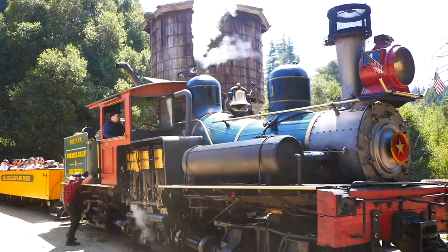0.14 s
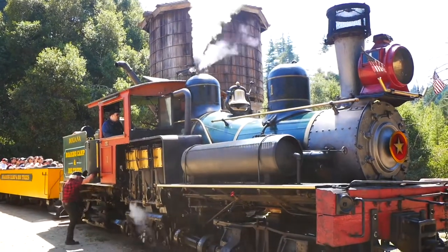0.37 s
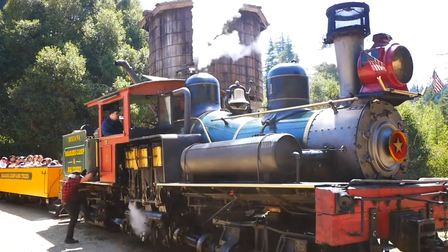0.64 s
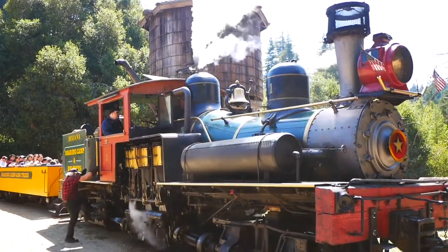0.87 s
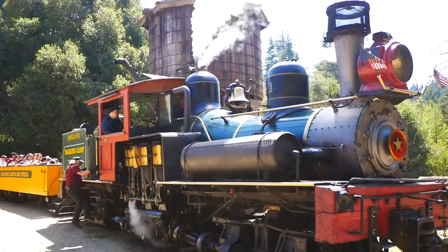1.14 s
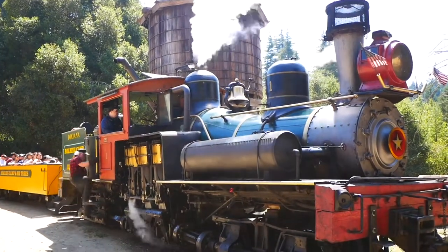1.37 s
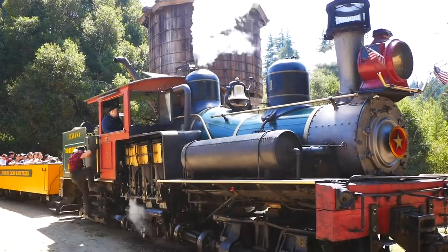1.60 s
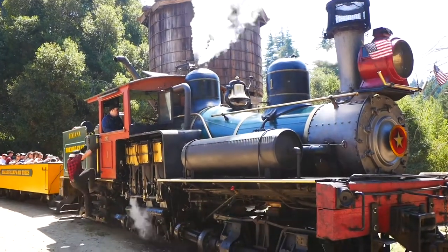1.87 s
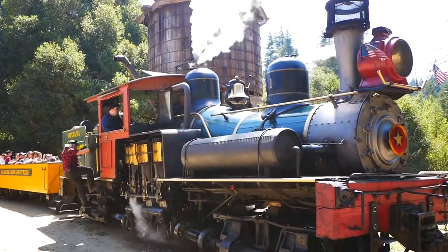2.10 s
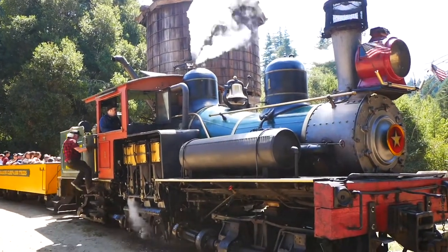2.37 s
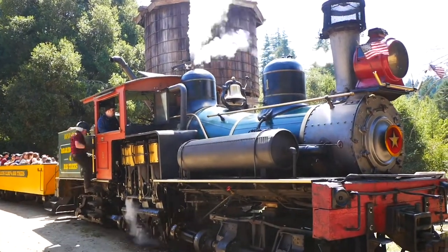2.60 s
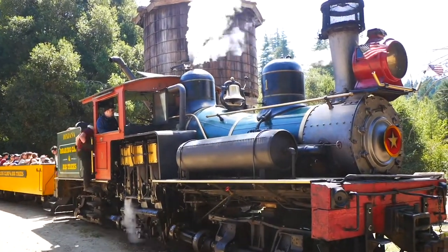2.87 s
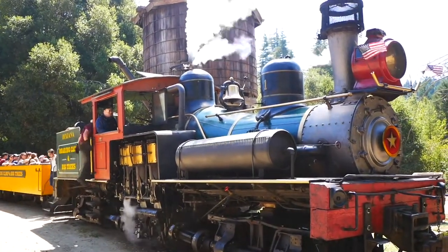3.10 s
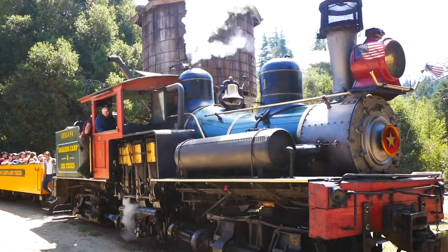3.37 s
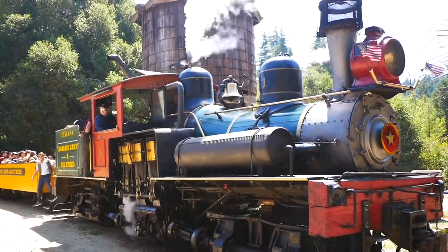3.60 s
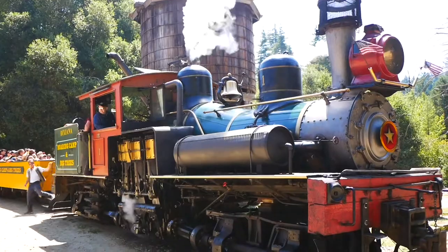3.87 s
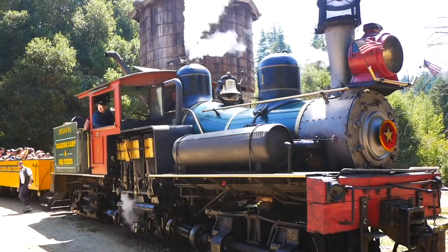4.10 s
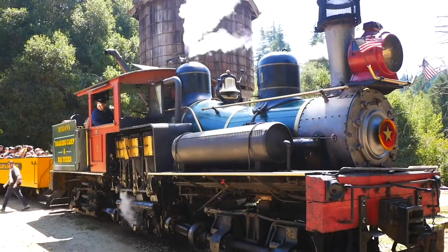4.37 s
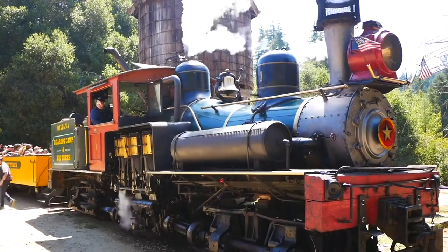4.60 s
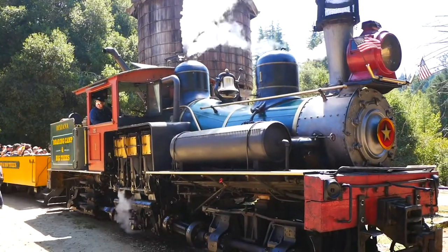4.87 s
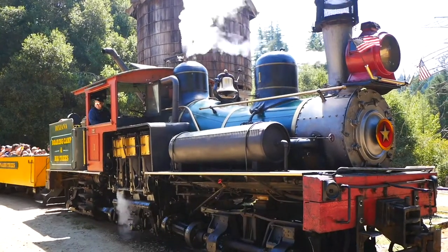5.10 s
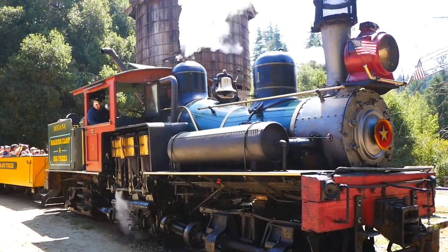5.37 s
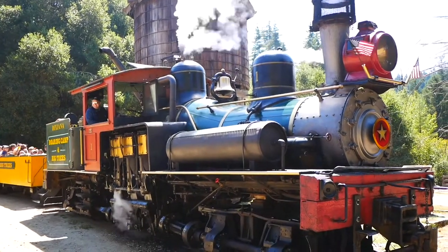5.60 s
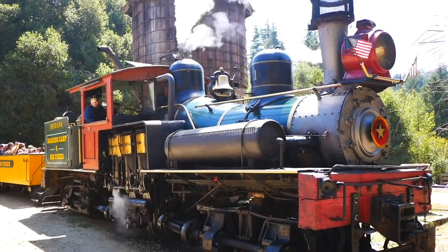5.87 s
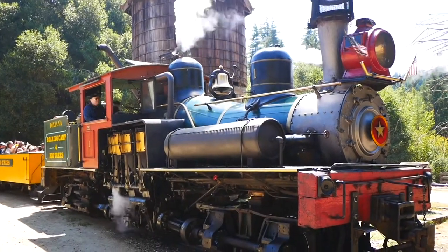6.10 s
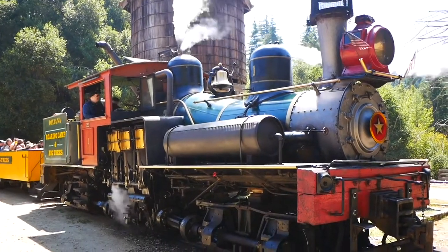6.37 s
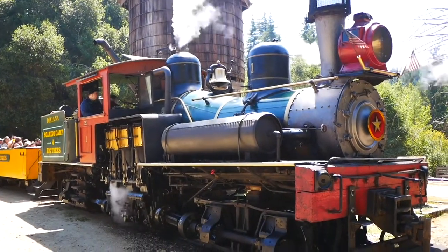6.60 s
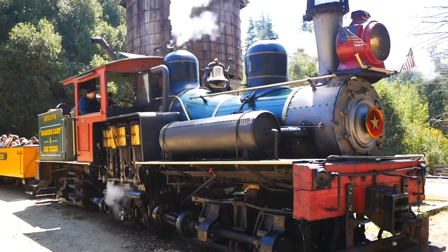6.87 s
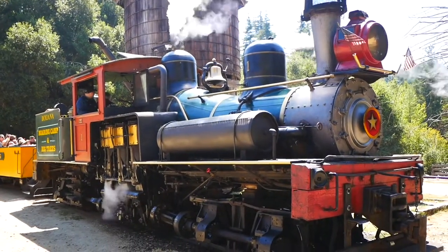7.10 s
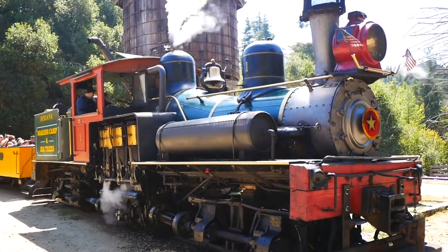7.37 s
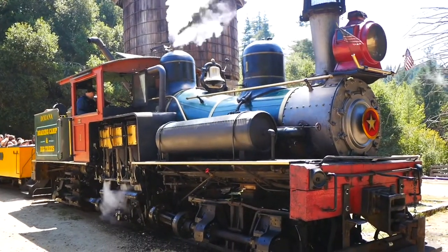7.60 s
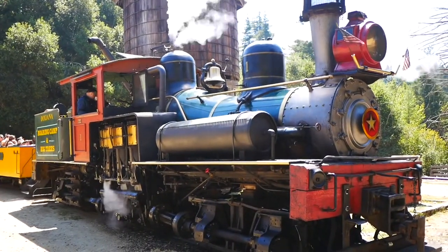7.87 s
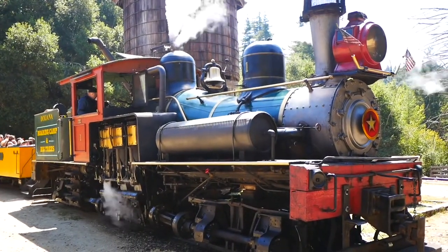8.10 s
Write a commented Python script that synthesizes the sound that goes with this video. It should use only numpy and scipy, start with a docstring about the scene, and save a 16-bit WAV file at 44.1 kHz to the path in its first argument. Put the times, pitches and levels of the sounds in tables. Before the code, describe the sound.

Steam escapes from a parked locomotive in a burst of bright hiss, while a thin, extremely high tone rings, then wavers, over soft rumble.

```python
"""A burst of bright hiss comes first: a standing steam locomotive vents steam outdoors, loudest at the start.
The hiss is noise coloured by the vent pipe. A very high whistle at the valve lip is a swept sine mixed with
narrow noise: breathy as it starts, soon almost pure, later wavering and breathy again.
Low noise that swells in puffs and a steady roar lie wide across the stereo field."""
import sys
import numpy as np
from scipy import signal
from scipy.io import wavfile
from scipy.ndimage import uniform_filter1d

SR = 44100
rng = np.random.default_rng(int(sys.argv[2]) if len(sys.argv) > 2 else 0)


def to_wav(sig):
    """Store sig (one row per channel, or 1-D mono) as 16-bit WAV at the path in sys.argv[1].

    Samples outside -1..1 are clipped; the rate is SR.
    """
    pcm = np.clip(np.atleast_2d(sig), -1, 1) * 32767
    pcm = np.round(pcm).astype(np.int16)
    wavfile.write(sys.argv[1], SR, pcm.T)  # frames by channels


def invert_db(level):
    """Linear amplitude ratio for a level in decibels (20 dB per decade), elementwise."""
    return 10 ** (np.asarray(level, dtype=float) / 20)


N = 362935
BASE_HZ = 10000   # the pitches of the whistle and its lower mode are counted from here

# course of the whistle: start_s, level_db (before falters and final gain), above_base_hz,
# slip_hz (depth of the downward slips)
WHISTLE_COURSE = [(0, -22, 125, 16), (.2, -19, 130, 6), (.6, -16, 133, 2.6), (.96, -15, 134, 2.9),
                  (1.55, -16, 141, 2.9), (2.1, -14.5, 153, 3), (2.42, -16, 172, 3.3),
                  (2.62, -15.5, 159.8, 5.1), (2.78, -17, 178.3, 24.1), (3.03, -16.5, 157.5, 10.9),
                  (3.17, -17.5, 217.6, 21), (3.45, -16.5, 216.2, 32.07), (3.7, -16, 240, 25),
                  (4.0, -20, 240, 11), (4.25, -25, 250, 25), (4.45, -17.5, 248, 15.9),
                  (4.71, -16.5, 250, 13.8), (5.05, -19, 225, 24.6), (5.35, -22.5, 243, 35.4),
                  (5.6, -20, 255, 23.6), (6.03, -17, 268, 18.8), (6.4, -19.5, 269.7, 17.7),
                  (6.65, -16, 287, 14.3), (6.92, -21, 278, 17.1), (7.19, -17, 297, 19), (7.4, -21, 276, 25),
                  (7.7, -23, 272, 27), (8.23, -21.5, 268, 28.6)]
# moments when the lower mode flares and the whistle's own tone gives way: centre_s, gain_db, half_length_s
LOWER_MODE_FLARES = [(3.197, 4.5, 0.039), (3.473, 15, 0.1), (3.654, 1, 0.036), (3.911, 26, 0.065),
                     (4.22, 11.5, 0.23), (4.57, 4.5, 0.068), (5.05, 4, 0.12), (5.375, 6.5, .15),
                     (7.5, -1, 0.12)]


def rms_one(x):
    """Scales a sound to an average strength (rms) of 1."""
    return x / np.sqrt(np.mean(x ** 2) + 1e-20)


def in_time(rows):
    """Draws each column of a table as a curve over time, one value per sample."""
    seconds, *columns = np.transpose(rows)
    return [np.interp(np.arange(N) / SR, seconds, column) for column in columns]


def at_hz(points, hz):
    """Reads a spectrum table at a frequency, in between its rows on a log scale."""
    table_hz, values = np.array(points).T[:2]
    return np.interp(np.log(hz), np.log(table_hz + 1e-9), values)


def fading(seconds):
    """Decays exponentially from 1 at the start."""
    return np.exp(-np.arange(N) / SR / seconds)


def bumps(centre_s, heights, half_s):
    """Adds up smooth rises and falls around given moments."""
    t = np.arange(0, N, 40) / SR
    away = (t - np.reshape(centre_s, (-1, 1))) / np.reshape(half_s, (-1, 1))
    return np.interp(np.arange(N) / SR, t, np.dot(heights, np.exp(-2 * away ** 2)))


def drift(rate_hz):
    """Wanders by chance with spread 1: noise at every 40th sample through two equal one-pole low-passes."""
    r = np.exp(-80 * np.pi * rate_hz / SR)
    white = rng.standard_normal(N // 40 + 2002)
    slow = signal.lfilter([1], [1, -2 * r, r * r], white)[2000:]   # leave out the filter's run-up
    return np.interp(np.arange(N) / 40, np.arange(len(slow)), rms_one(slow))


def narrow_noise(phase, rate_hz):
    """Makes narrow noise around a running phase by letting its sine and cosine wander; rms about 1."""
    return drift(rate_hz) * np.sin(phase) + drift(rate_hz) * np.cos(phase)


def resonance(x, hz, width_hz):
    """Rings at one frequency: a two-pole band filter with gain 1 on top."""
    r = np.exp(-np.pi * width_hz / SR)
    top = (1 - r * r) / 2 * np.array([1, 0, -1])
    return signal.lfilter(top, [1, -2 * r * np.cos(2 * np.pi * hz / SR), r * r], x)


def banded_noise(spectrum, likeness, edges, shared_db, shared_rate, own_db):
    """Adds bands of stereo noise, each with its level, flicker, likeness and balance; rms 1."""
    # left-right balance: pitch_hz, left_over_right_db
    balance = [(60, 1.5), (240, 6), (950, 1), (3750, 2), (14900, -1)]
    out, together = 0, drift(shared_rate)
    white = rng.standard_normal((2, 2, N))   # neighbouring bands get unrelated noise
    for k, (low, high) in enumerate(zip(edges, edges[1:])):
        band = signal.butter(2, [low, high], "band", fs=SR, output="sos")
        mid, side = signal.sosfilt(band, white[k % 2])
        hz = np.sqrt(low * high)
        alike = np.clip(at_hz(likeness, hz), -1, 1)   # 1: same in both channels, -1: opposite
        stereo = np.sqrt(1 + alike) * mid + np.sqrt(1 - alike) * side * [[1], [-1]]
        gain = invert_db(at_hz(spectrum, hz) + shared_db * together + own_db * drift(9.5))
        lean = invert_db(at_hz(balance, hz) / 2 * np.array([[1], [-1]]))
        out = out + gain * lean * stereo
    return rms_one(out)


def jet():
    """Makes the smooth bright hiss of steam, lifted at the vent pipe's resonances, thinned at its cancellations."""
    # steam flow heard as hiss: start_s, level_db (before the gains that follow)
    flow = [(0, -26), (.15, -28), (.35, -31.5), (.8, -33), (1.25, -35), (2.6, -35), (3.7, -35.5),
            (4.3, -33.3), (4.6, -36), (5.45, -33), (6.15, -35.5), (7.25, -36), (7.85, -34), (8.23, -34.5)]
    # colour of the hiss: pitch_hz, relative_level_db
    hiss_colour = [(300, -15.5), (700, -14), (1200, -10.5), (1800, -6.5), (2600, -6.5), (4000, -6.5),
                   (6000, -6), (7000, -2), (8600, 1.5), (9700, 2), (10500, 3.5), (11500, -4.5), (12300, -1),
                   (14000, -5), (15500, -16.5)]
    # left-right likeness of the hiss: pitch_hz, likeness (-1 to 1)
    hiss_likeness = [(500, 0.14), (1400, 1), (3000, 0.82), (6800, 1), (15000, 0.99)]
    # vent pipe resonances: pitch_hz, width_hz, added_db (full strength, once settled)
    pipe_lifts = [(2580, 100, -1.5), (3550, 200, -8), (7330, 210, -13.5), (10280, 366, 3.5),
                  (12210, 510, 1)]
    # cancellations in the pipe: pitch_hz, width_hz, level_db of what is taken away
    pipe_dips = [(1890, 210, -9), (2876, 78, -6), (6210, 160, -13.5)]
    early_db, settles_s = 9, 1.6   # the resonances are weaker at first
    wander_db = 0.31   # unevenness of the flow
    hiss = banded_noise(hiss_colour, hiss_likeness, np.geomspace(250, 16000, num=23),
                        shared_db=0.53, shared_rate=12.0, own_db=0.68)
    lifts = sum(invert_db(level_db) * resonance(hiss, hz, width_hz) for hz, width_hz, level_db in pipe_lifts)
    dips = sum(invert_db(level_db) * resonance(hiss, hz, width_hz) for hz, width_hz, level_db in pipe_dips)
    coloured = rms_one(hiss + invert_db(-early_db * fading(settles_s)) * lifts - dips)
    flow_db = in_time(flow)[0] + wander_db * drift(1.4) + 4.0
    return invert_db(flow_db) * coloured


def whistle_db():
    """Follows the level of the whistle, with its brief falters."""
    # the whistle falters: centre_s, loss_db (below zero: a gain), half_length_s
    falters = [(0.113, 9.5, 0.016), (0.294, -1, 0.017), (0.54, 3.5, .03), (0.636, 7, 0.0075),
               (0.883, 1.5, 0.061), (1.293, 1.5, 0.053), (1.63, 1, 0.063), (2.209, 4, .04),
               (2.427, 3.5, 0.15), (2.737, 1.5, 0.045), (2.986, 3, 0.039), (3.116, 11, 0.04),
               (3.234, -0.5, .04), (3.34, 1.5, 0.044), (3.591, 1, 0.047), (4.62, 1, 0.037),
               (4.825, 11, 0.076), (4.93, 5.5, 0.055), (5.147, 5, 0.061), (5.44, 4.5, 0.043),
               (5.747, 3.5, 0.059), (6.262, 4.5, 0.049), (6.52, 2.5, .04), (6.813, 5, 0.031),
               (6.93, -3, 0.01), (7.06, 8.5, 0.04), (7.29, 1.5, 0.048), (7.65, 3, .06),
               (7.826, -0.5, 0.044), (7.904, 2, .03), (8.184, 3.5, 0.02)]
    return in_time(WHISTLE_COURSE)[0] - bumps(*np.transpose(falters))


def breathy_share():
    """Gives the noise share of the whistle, 0-1: more when it is weak, when it slips and in the opening burst."""
    clear_db, per_db, per_slip_hz = -14.5, 0.0366, 0.0065
    opening_share, burst_s = 0.34, 0.54
    level_db, _, slip_hz = in_time(WHISTLE_COURSE)
    share = per_db * (clear_db - level_db) + per_slip_hz * slip_hz + opening_share * fading(burst_s)
    return np.clip(share, 0, 1)


def whistle_phase(below_hz, slips):
    """Runs the whistle's phase along; turbulence makes the pitch slip down more than up."""
    _, above_hz, slip_hz = in_time(WHISTLE_COURSE)
    return 2 * np.pi * np.cumsum(BASE_HZ + above_hz - below_hz - slip_hz * slips) / SR


def lower_mode():
    """Makes a narrow unsteady tone, mostly pitched under the whistle, that grows with its slips and breath."""
    base_db, db_per_decade, breath_db = -34.5, 9, 10   # relative to the whistle
    above_hz, rise_hz, rise_s = 196.3, 140.6, 3.0   # it climbs to its pitch
    slip_hz = in_time(WHISTLE_COURSE)[2]
    slipping_db = db_per_decade * np.log10(np.maximum(slip_hz, 1))
    flare_db = bumps(*np.transpose(LOWER_MODE_FLARES))
    relative_db = base_db + slipping_db + breath_db * breathy_share() + flare_db
    hz = BASE_HZ + above_hz - rise_hz * fading(rise_s)
    return invert_db(relative_db) * narrow_noise(2 * np.pi * np.cumsum(hz) / SR, 34.0)


def whistle():
    """Sounds a self-sustained tone at the valve lip, partly broken into narrow noise hanging just under it."""
    waver_hz, breath_rate_hz, breath_below_hz = 45.2, 110, 20
    flutter_db, flutter_db_per_slip_hz = 0.5, 0.059   # slipping pitch shakes the level too
    flare_takes = 0.27   # dB the tone loses per dB of the lower mode's flares
    lean_db, lean_wander_db = 0.5, 0.67   # left over right
    breathy = breathy_share()
    slips = np.exp(0.6 * np.clip(drift(waver_hz), -3, 2.5)) - 1   # reaches further down in pitch than up
    shake_db = (flutter_db + flutter_db_per_slip_hz * in_time(WHISTLE_COURSE)[2]) * drift(36)
    taken_db = flare_takes * bumps(*np.transpose(LOWER_MODE_FLARES))
    tone = np.sqrt(2) * np.sin(whistle_phase(0, slips)) * invert_db(shake_db - taken_db)
    breath = narrow_noise(whistle_phase(breath_below_hz, 0), breath_rate_hz)
    direct = np.sqrt(1 - breathy ** 2) * tone + breathy * breath + lower_mode()
    # sound scattered off boiler and ground arrives opposite in the two channels
    scattered = invert_db(-20.5) * narrow_noise(whistle_phase(0, 0), 12) * [[1], [-1]]
    lean = invert_db((lean_db + lean_wander_db * drift(1.5)) / 2 * [[1], [-1]])
    return invert_db(whistle_db()) * (direct * lean + scattered)


def rumble_db():
    """Sets puffs on a level that starts weak, builds up and shares the swings of the whistle."""
    # the rumble puffs: centre_s, gain_db
    puff_times = [(1.03, 5.5), (1.18, 2), (1.5, 3.5), (1.75, 1.5), (1.92, 3.5), (2.15, 5), (2.28, 4),
                  (2.61, 6), (2.88, 3.5), (3.03, 2), (3.4, 2), (3.68, 4), (4.39, 4), (4.51, 2),
                  (4.711, 3.5), (5.03, 2), (5.26, 2.5), (6.01, 2), (6.62, 2), (7.14, 1.5), (7.96, 4.5),
                  (8.22, 4)]
    base_db, late_db, late_s = -48.5, 8.5, 0.28
    follows_quick, follows_slow = 0.78, 0.33   # shares of the whistle's quick and slow swings
    puff_half_s, wander_db = 0.089, 0.74
    level_db = whistle_db()
    slow_db = uniform_filter1d(level_db, size=SR)
    swings_db = follows_quick * (level_db - slow_db) + follows_slow * (slow_db - slow_db.mean())
    centre_s, gain_db = np.transpose(puff_times)
    puffs_db = bumps(centre_s, gain_db, puff_half_s)
    return base_db - late_db * fading(late_s) + swings_db + puffs_db + wander_db * drift(1.7)


def rumble():
    """Makes lumpy low puffs over a steady firebox roar, both mostly opposite in the two channels."""
    # colour of the puffs: pitch_hz, relative_level_db
    puff_colour = [(25, -30), (60, -16), (110, -8), (220, -1), (400, -3), (700, -5.5), (1100, -10.5)]
    # colour of the roar: pitch_hz, relative_level_db
    roar_colour = [(150, -5.5), (400, -3.5), (800, -2), (1300, -5), (2200, 2), (3200, -15)]
    # left-right likeness of both: pitch_hz, likeness (-1 to 1)
    low_likeness = [(60, -0.46), (300, -0.7), (1500, -0.21)]
    puffs = banded_noise(puff_colour, low_likeness, np.geomspace(20, 1300, num=11),
                         shared_db=1.0, shared_rate=27.0, own_db=2.5)
    roar = banded_noise(roar_colour, low_likeness, np.geomspace(120, 3200, num=9),
                        shared_db=-2.0, shared_rate=2.7, own_db=-0.1)
    return invert_db(rumble_db()) * puffs + invert_db(-49) * roar


def scene():
    """Puts the whistle near the centre, with hiss and rumble around it."""
    return jet() + whistle() + rumble()


def microphone_bend(x):
    """Bends the sound by a square law, as microphones do a little: the whistle's unevenness becomes a low mutter."""
    bend_db, low_hz, high_hz, right_share = -9, 95, 190, -0.47   # the right is opposite and weaker
    band = signal.butter(2, [low_hz, high_hz], "band", fs=SR, output="sos")
    squared = x ** 2 - np.mean(x[:, :2000] ** 2)   # starts near zero, so the filter does not thump
    return invert_db(bend_db) * signal.sosfilt(band, squared) * [[1], [right_share]]


def treble_gate(x):
    """Measures the whistle's band frame by frame and mutes the treble bands that it drowns, patch by patch."""
    # treble bands that drop out: low_hz, high_hz, shut_db (whistle level that shuts them),
    # scatter_db (spread of each of two chance shifts)
    dropouts = [(9100, 9500, -14.9, .7), (9500, 10000, -15.4, .8), (10350, 10650, -17.5, .8),
                (10650, 11600, -18.7, .7), (11600, 12600, -16.9, .9), (12600, 13800, -16.9, 1.0),
                (13800, 15000, -17.6, 1.5), (15000, 15600, -21, 2.)]
    hz, s, frames = signal.stft(x, SR, nperseg=2048)
    tone = (hz > 10000) & (hz < 10350)
    power = np.sum(np.abs(frames[:, tone].mean(axis=0)) ** 2, axis=0) * 4 / 3
    tone_db = 10 * np.log10(uniform_filter1d(power, size=3) + 1e-12)
    whole = rng.standard_normal((len(dropouts), len(s)))   # one chance per band and frame
    patch = rng.standard_normal((len(hz) // 12 + 1, len(s)))   # one chance per 12 neighbouring bins
    patch = np.repeat(patch, 12, axis=0)[:len(hz)]
    for (low_hz, high_hz, shut_db, scatter_db), chance in zip(dropouts, whole):
        band = (hz >= low_hz) & (hz < high_hz)
        excess_db = tone_db - shut_db + scatter_db * (chance + patch[band])
        frames[:, band] *= 1 / (1 + np.exp(np.clip(8 * excess_db, -30, 30)))
    return signal.istft(frames, SR, nperseg=2048)[1][:, :N]


def top_cut(x):
    """Nothing passes above the cut-off."""
    return signal.sosfilt(signal.butter(12, 15490, fs=SR, output="sos"), x)


def record(dry):
    """Adds the slight bend, a final gain, a narrow notch in the treble and a gate on the drowned bands."""
    gain_db, notch_hz, notch_width_hz = 2.0, 7850, 200
    bent = invert_db(gain_db) * (dry + microphone_bend(dry))
    notch = signal.iirnotch(notch_hz, notch_hz / notch_width_hz, fs=SR)
    notched = signal.lfilter(*notch, bent)
    return top_cut(treble_gate(notched))


dry = scene()
out = record(dry)
to_wav(out)
```